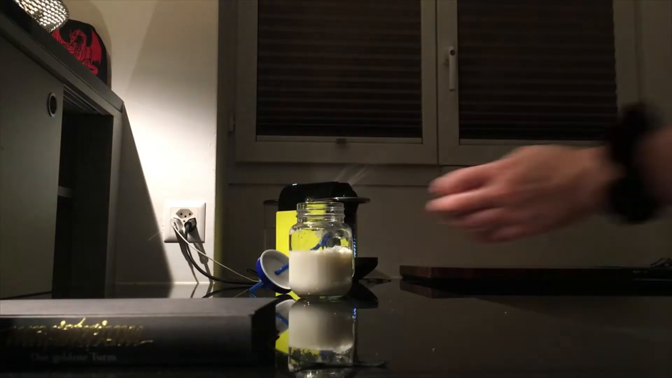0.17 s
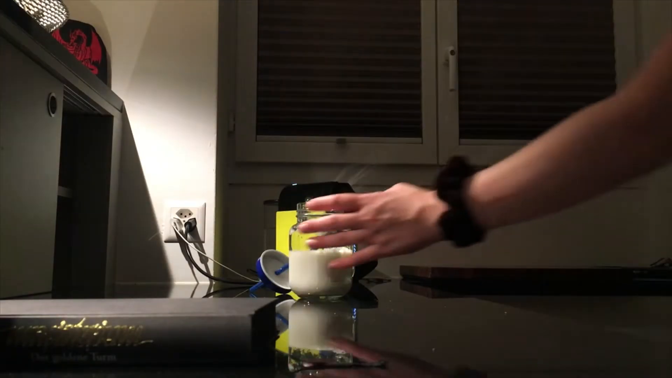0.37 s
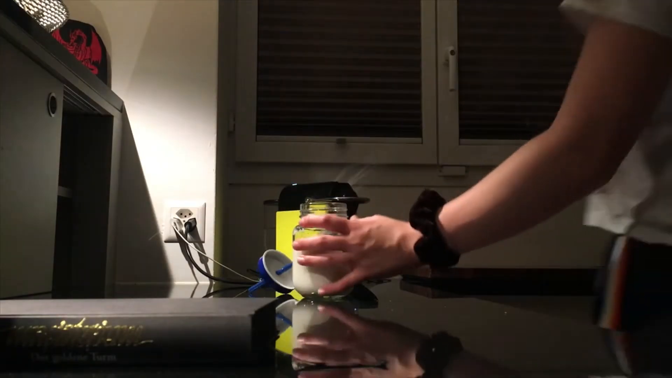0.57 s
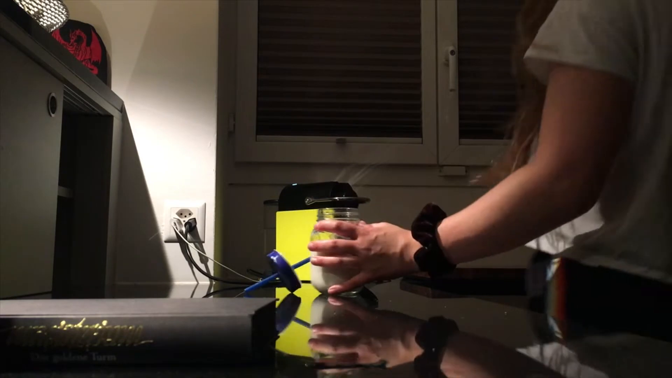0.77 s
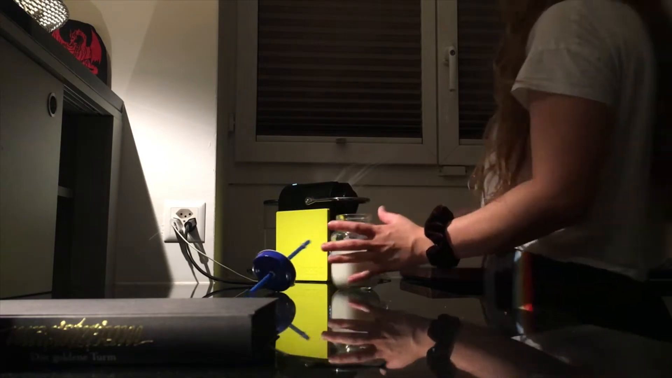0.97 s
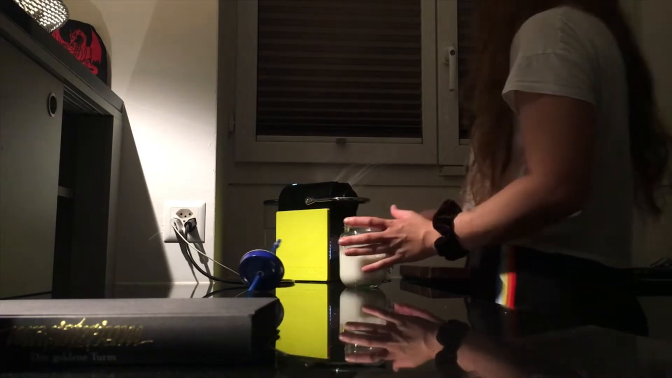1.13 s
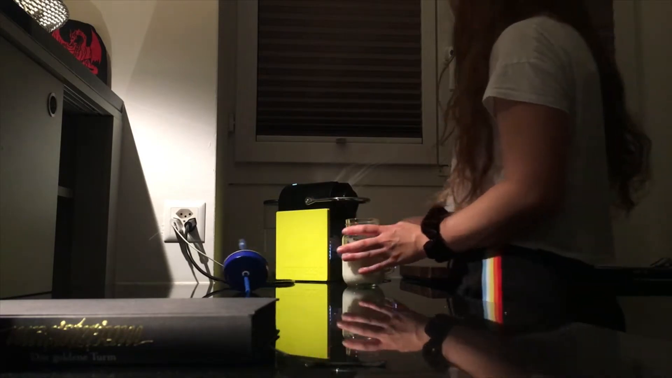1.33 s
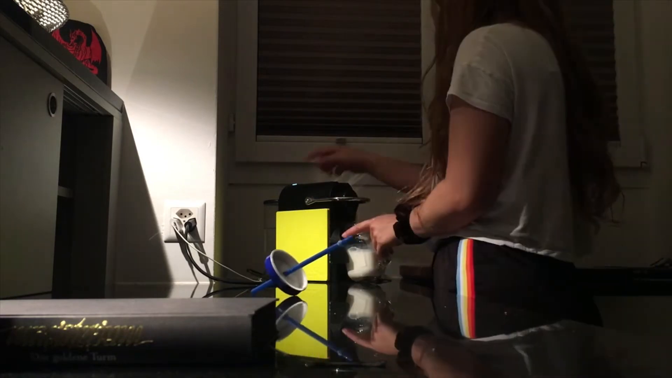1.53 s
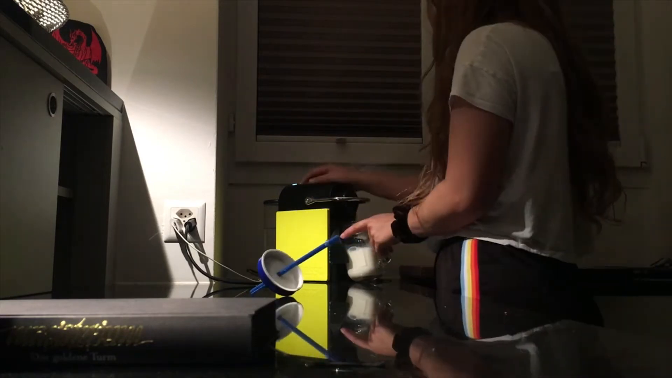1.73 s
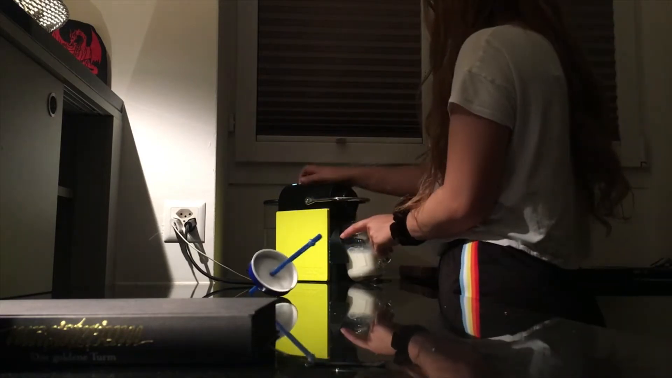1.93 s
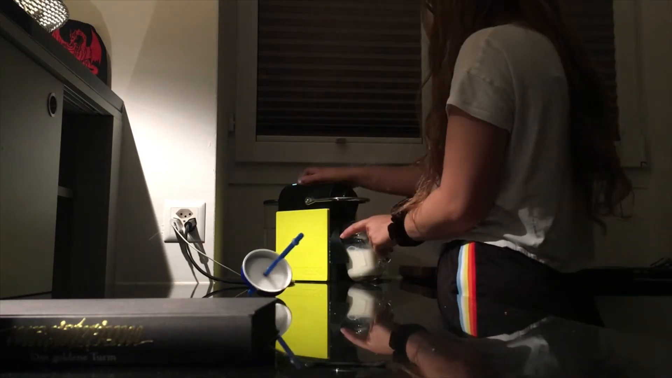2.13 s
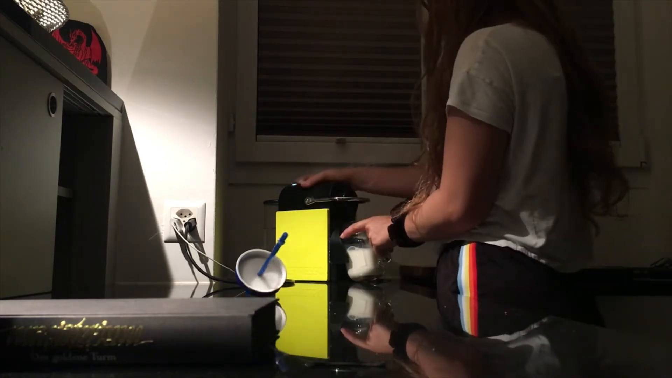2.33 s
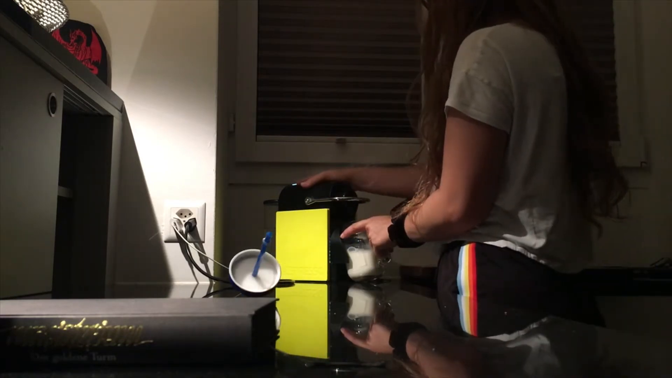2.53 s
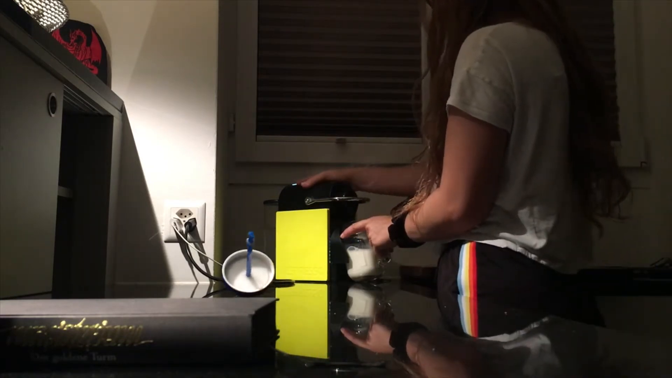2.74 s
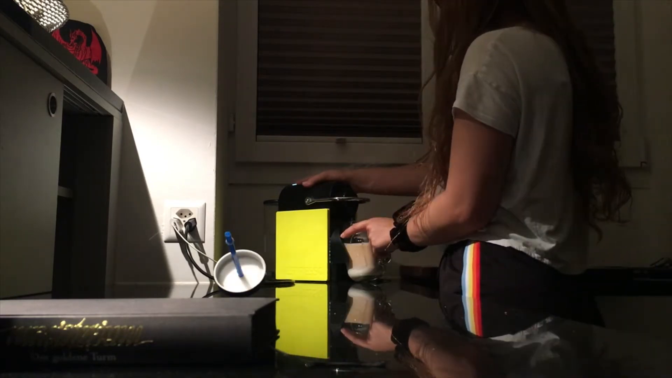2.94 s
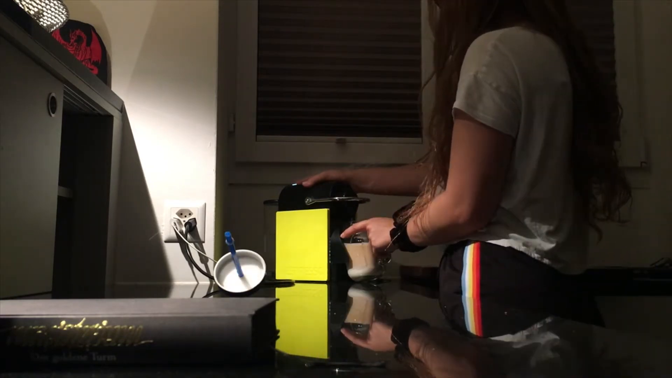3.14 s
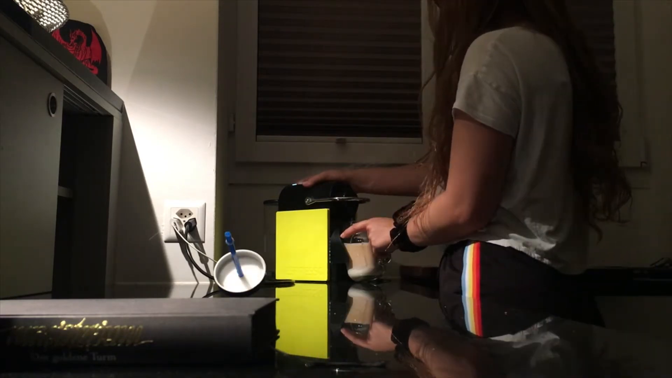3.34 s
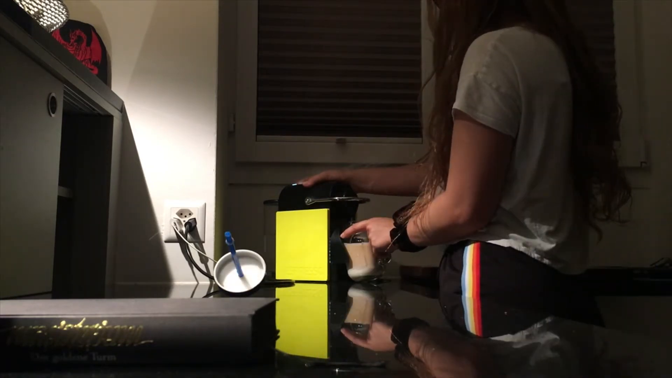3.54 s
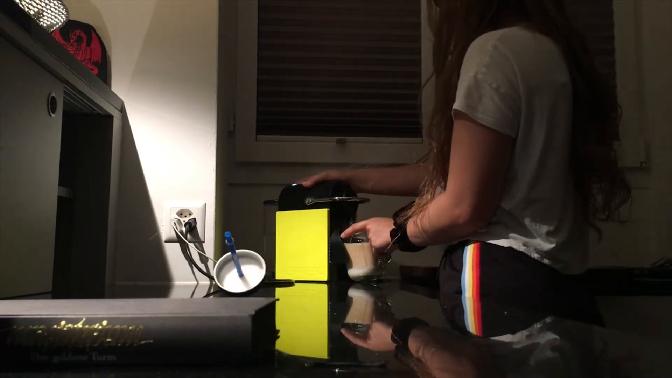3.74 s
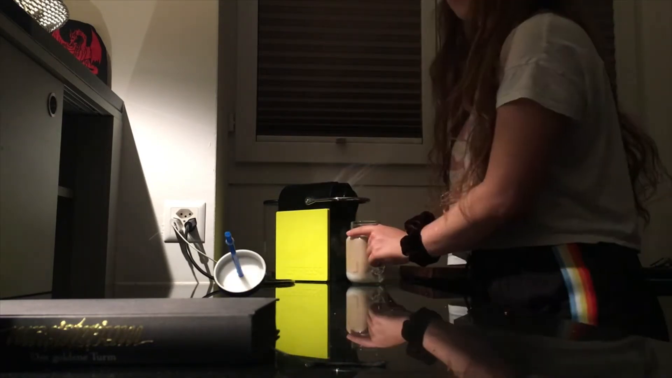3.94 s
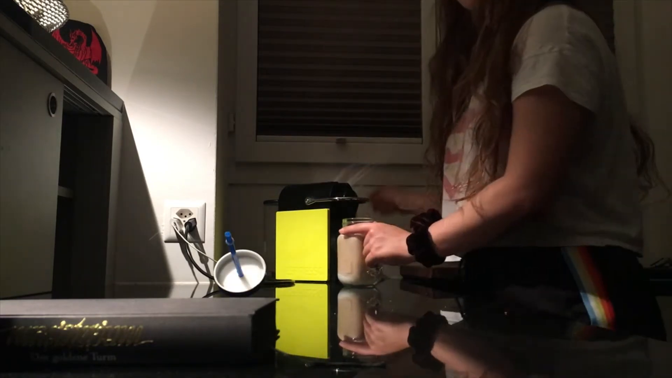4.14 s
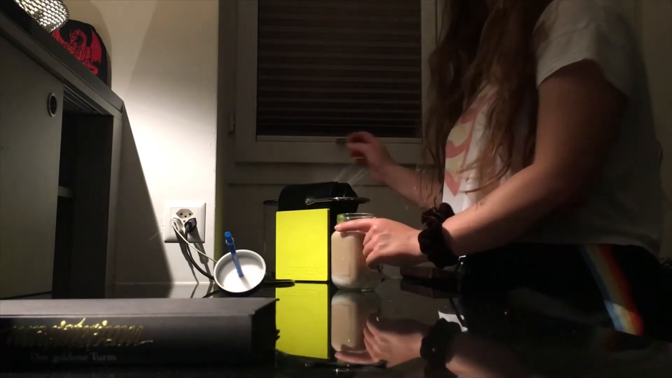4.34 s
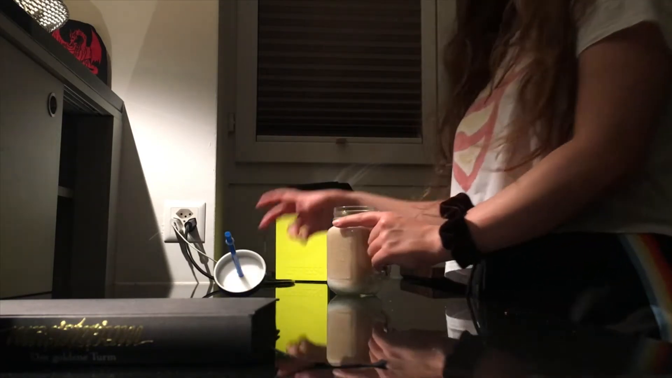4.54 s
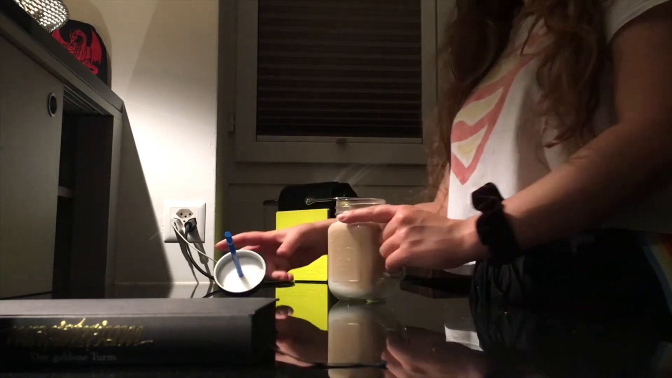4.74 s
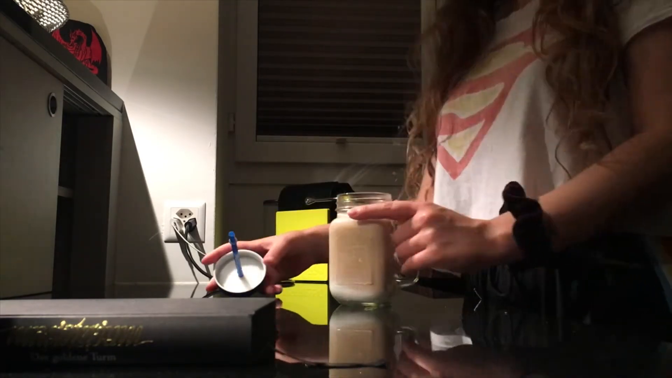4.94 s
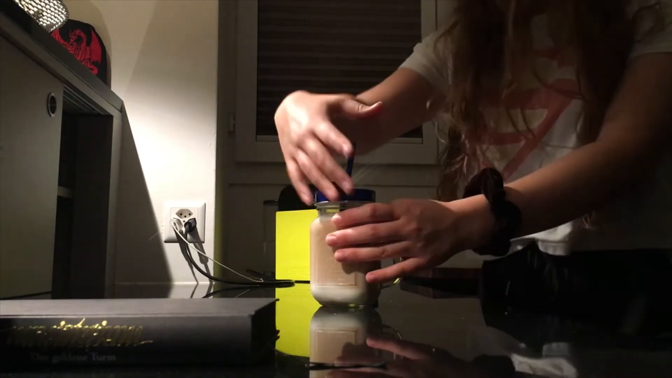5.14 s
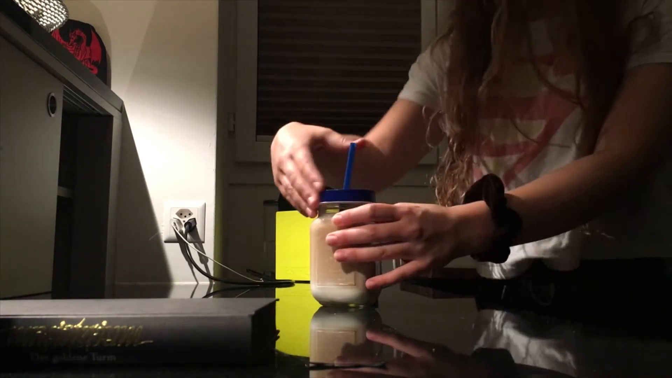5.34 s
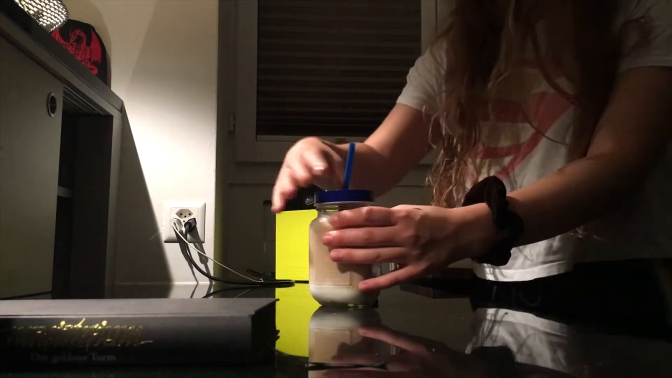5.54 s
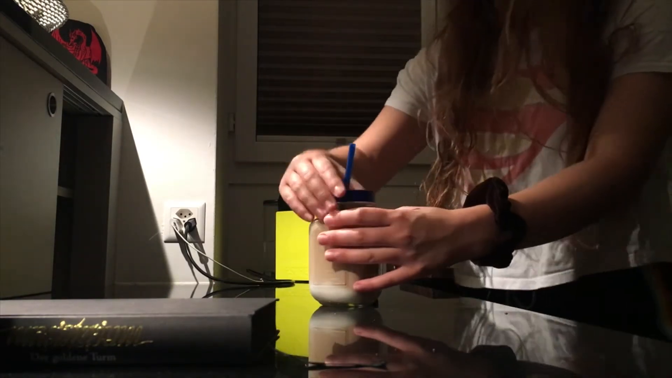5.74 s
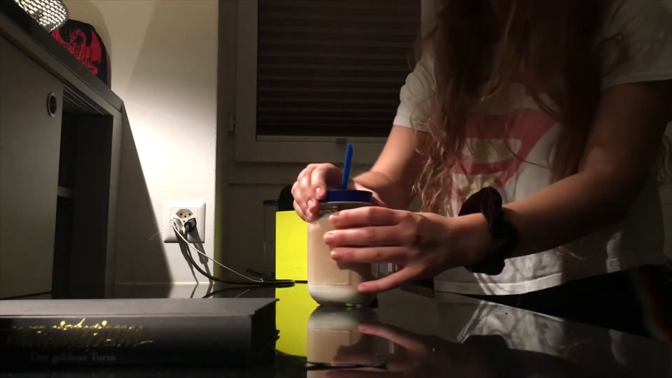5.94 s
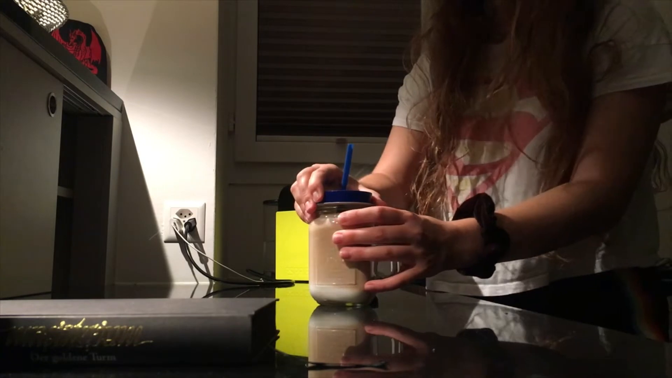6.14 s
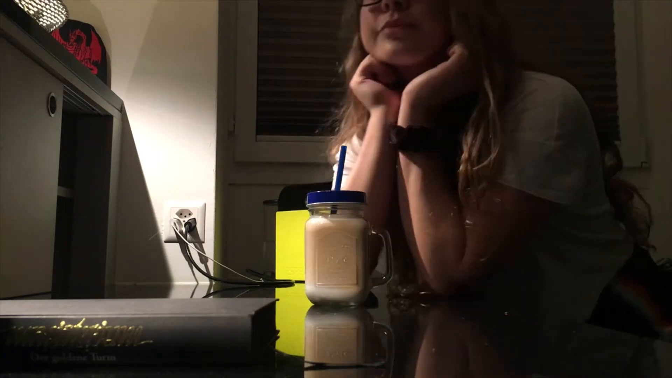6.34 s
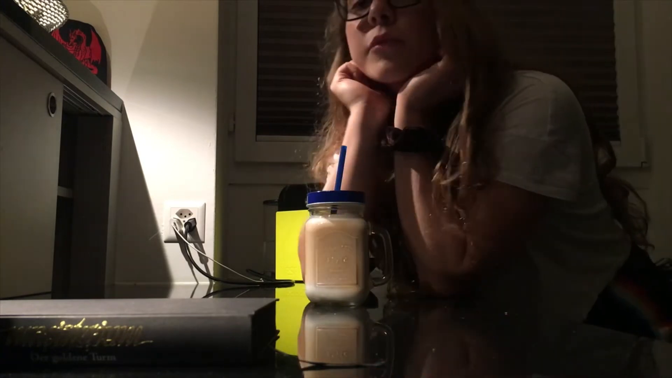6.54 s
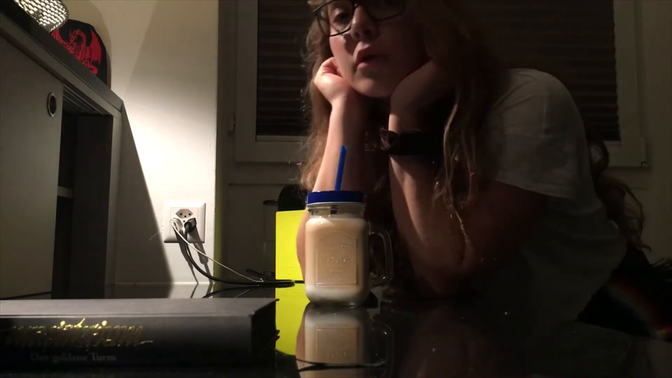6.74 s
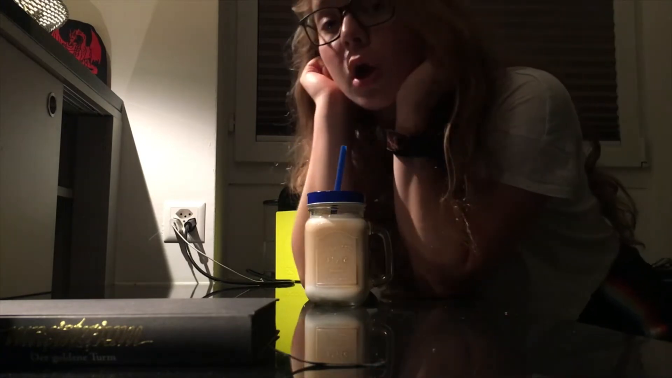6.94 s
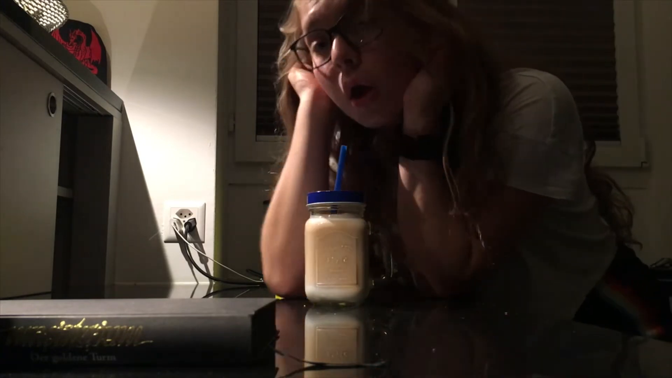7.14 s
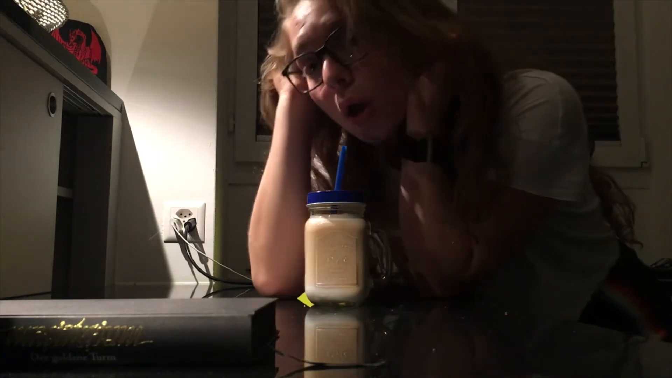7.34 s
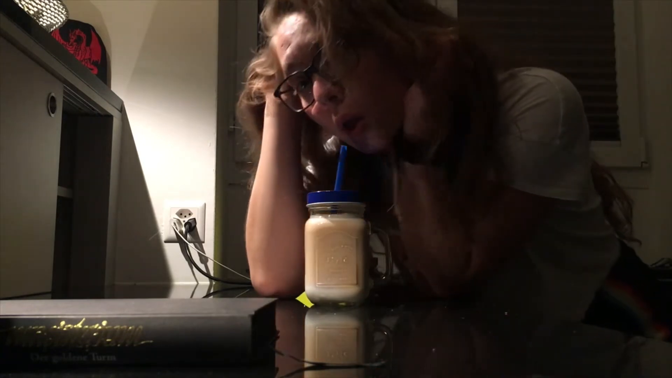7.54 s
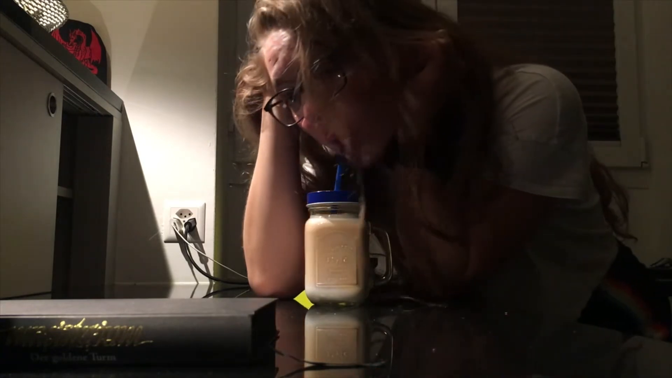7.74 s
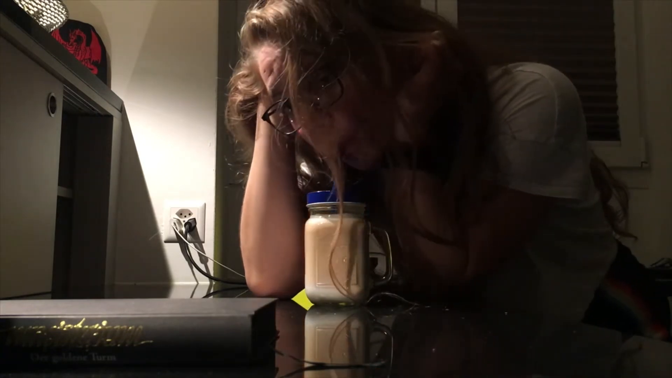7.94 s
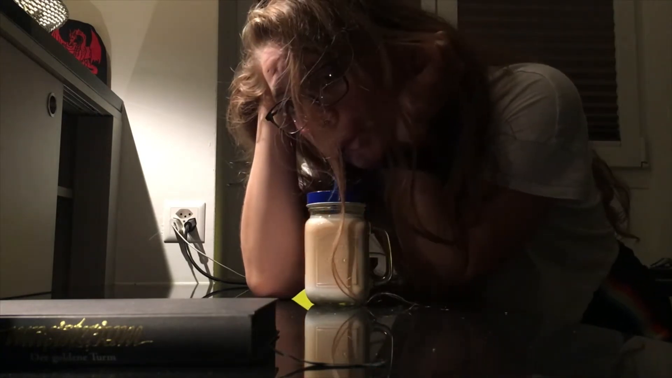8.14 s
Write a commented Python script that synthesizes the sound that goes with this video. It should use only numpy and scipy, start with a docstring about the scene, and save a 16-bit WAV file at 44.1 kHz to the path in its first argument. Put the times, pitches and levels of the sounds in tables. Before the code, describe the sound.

Glass dragged with a judder, a harsh low vibrating pump buzz that changes under load, a loud hollow plastic clack, then quiet lid and straw handling.

```python
"""A low room rumble, a faint swish of clothes and a soft bump, then a glass jar dragged over a kitchen counter.
Friction noise and struck-glass modes form the jar; cracks and casing modes form the coffee machine's button.
Its vibrating pump buzzes near 50 Hz, first free, then under load: a stroke-locked hum, churn and rattle.
The lever snaps open, the jar is dragged back, and a straw scratches, a lid taps and its thread rubs on the
glass. Most contact sounds excite the sparse, decaying reflections of a small hard room."""
import sys
import numpy as np
from scipy import signal
from scipy.fft import rfft, irfft
from scipy.io import wavfile
from scipy.ndimage import uniform_filter1d, map_coordinates

SR = 44100
rng = np.random.default_rng(int(sys.argv[2]) if len(sys.argv) > 2 else 0)


def wav_record(signal):
    """Record a signal, one row per channel, as 16-bit PCM in the file named by sys.argv[1]."""
    frames = np.transpose(np.atleast_2d(signal))
    bounded = np.clip(frames, -1, 1)
    # unit amplitude maps onto the largest positive 16-bit level
    quanta = np.round(bounded * 32767).astype(np.int16)
    wavfile.write(sys.argv[1], SR, quanta)


N = 361619
TIME = np.arange(N) / SR

# Colours are spectra scaled to unit power gain, so their dB values are relative.
# Levels of short blows are their energy spread over a hundredth of a second.

# Reverberation of the kitchen. Each row: frequency in Hz, t60 in s.
ROOM = [(700, 0.67), (3500, 0.64), (12000, 0.48)]
EDGE_HZ = 15900  # upper limit of the band

# Colour of the room rumble. Each row: frequency in Hz, density in dB per Hz.
FLOOR = [(30, -13), (72, -17), (105, -6), (200, -8.5), (390, -8), (510, -16.5), (900, -14.5), (1500, -29.5),
         (4800, -37), (15500, -42.5)]
FLOOR_DB = -64

# Clothes swish with each move of the arm. Each row: start in s, length before the release in s, level in dB.
SWISHES = [(0.062, 0.15, -61.5), (0.643, 0.073, -57), (0.793, 0.21, -65.5), (1.144, 0.14, -60.5),
           (4.59, 0.098, -65), (5.811, 0.24, -76)]
SWISH_ATTACK_S, SWISH_RELEASE_DB_PER_S = 0.036, 85
# Colour of rubbing cloth. Each row: frequency in Hz, density in dB per Hz.
CLOTH_COLOUR = [(1200, -8), (3500, 1), (7000, -3), (15000, -9.5)]

# Soft bumps on the counter and floor. Each row: time in s, level in dB.
BUMPS = [(0.283, -42), (4.03, -53), (4.345, -52), (4.628, -47.5), (6.28, -49.5)]
# Colour of the bumps. Each row: frequency in Hz, density in dB per Hz.
BUMP_COLOUR = [(38, -0.5), (70, -0.5), (110, -9)]

# The jar dragged away and back. Each row: start in s, stop in s, fastest moment in s, level then in dB,
# dB lost by the stop, glass note in Hz, level of the note relative to the friction in dB.
DRAGS = [(0.736, 1.43, 0.86, -40, 13, 1782, -25), (4.2, 5.033, 4.566, -44, 5, 4500, -39)]
# Colour of the drag away. Each row: frequency in Hz, density in dB per Hz.
PUSH_COLOUR = [(230, -41.5), (450, -20), (610, -2), (700, -1.5), (830, 9), (980, -3), (1750, -16.5),
               (5000, -47)]
# Colour of the drag back. Each row: frequency in Hz, density in dB per Hz.
PULL_COLOUR = [(200, -18.5), (540, -4), (700, 4), (820, -9), (980, 2.5), (1220, -5.5), (1530, -2),
               (1900, -13), (2700, -26.5), (5200, -31.5)]
# The jar's base catches on the counter. Each row: time in s, level in dB.
CATCHES = [(0.568, -56), (0.590, -46), (0.607, -44.5), (0.740, -36), (0.782, -41), (0.814, -37.5),
           (0.878, -39.5), (1.145, -42.5), (4.617, -44), (4.659, -42.5), (4.910, -45.5)]
# The glass base sings faintly as it slides. Each row: time in s, central pitch in Hz, level in dB.
SQUEAL = [(0.70, 5280, -75), (0.89, 5030, -68), (0.955, 4770, -68), (1.03, 4680, -77), (1.14, 4860, -73)]

# The glass clinks. Each row: time in s, ring level in dB, click level in dB.
CLINKS = [(0.706, -52.5, -49), (0.843, -50, -46)]
# Modes of the glass. Each row: frequency in Hz, relative level in dB, t60 in s.
GLASS = [(2530, -1, 0.03), (3405, 3, 0.065)]
# Colour of the click of lid or glass. Each row: frequency in Hz, density in dB per Hz.
LID_CLICK = [(700, 21.5), (1900, 4), (3500, -7), (15000, -28)]

# Button and lever of the machine, the last in three quick contacts. Each row: time in s,
# hollow ring level in dB, clatter level in dB, crack level in dB, crack decay constant in s.
KNOCKS = [(1.696, -57, -47.5, -49.5, 0.008), (1.757, -44.5, -39, -53, 0.006),
          (1.819, -72, -50.5, -56, 0.007), (3.883, -35, -42, -55.5, 0.006), (3.902, -32, -28.5, -39, 0.004),
          (4.022, -35, -29.5, -30, 0.005), (4.0251, -25, -22.5, -23, 0.005),
          (4.029, -15, -28.5, -27.5, 0.004)]
# Hollow casing: a short thud over a lasting ring. Each row: frequency in Hz, level in dB before the
# casing's band filter, t60 in s.
CASING = [(565, -12, 0.16), (642, -13.5, 0.15), (688, -10, 0.19), (715, 0, 0.03)]
# Band that the casing radiates: lower and upper edge in Hz.
CASING_BAND_HZ = (480, 960)
# Colour of the clattering parts. Each row: frequency in Hz, density in dB per Hz.
CLATTER = [(130, -7), (480, -7.5), (720, 3), (960, -1.5), (1500, -4), (1900, -12.5), (3900, -24),
           (7000, -30)]
# Colour of the hard plastic crack. Each row: frequency in Hz, density in dB per Hz.
CRACK = [(110, -16), (400, -6), (1400, 2.5), (2600, -5), (4000, -1.5), (5000, -7), (6200, -7.5),
         (15500, -24.5)]
LATCH_S, LATCH_DB = 3.9025, -27  # the lever's latch lets go
# Modes of the latch. Each row: frequency in Hz, relative level in dB, t60 in s.
LATCH = [(940, 0, 0.09), (1105, -3, 0.07), (1470, -2, 0.025), (3780, -5, 0.016)]

PUMP_ON_S, FALTER_S, LOAD_S, PUMP_OFF_S = 1.938, 2.887, 2.898, 3.854
STROKE_HZ, SNAP_RISE_S = 49.94, 0.0022
FREE_DRIFT, LOADED_DRIFT, UNEVEN = 0.5, 0.17, 0.11  # relative rms: hum drift free and loaded, stroke force
# Hum of the free pump. Each row: multiple of the stroke rate, relative level in dB.
FREE_HUM = [(3, 0.5), (4, 2.5), (5, 2.5), (6, -1), (7, 0), (8, -2), (9, 5.5), (10, 9.5), (15, 7.5),
            (16, 5.5), (20, 6.5), (25, 8), (30, 8), (49, 3.5)]
# Hum of the loaded pump. Each row: multiple of the stroke rate, relative level in dB.
LOADED_HUM = [(3, -12.5), (4, -12.5), (6, -12), (7, -23.5), (8, -14), (9, -15), (10, -10.5), (11, -15),
              (12, -14.5), (13, -16), (14, -20), (16, -10.5), (17, -11.5), (18, -7), (19, -11), (20, 0),
              (21, -13.5)]
# Rattle of the free pump. Each row: frequency in Hz, density in dB per Hz.
FREE_RATTLE = [(970, -5), (1650, -2), (2450, 1.5), (3240, -7), (4250, -4.5), (4850, -11.5), (5500, -6),
               (15500, -24)]
# Rattle of the loaded pump. Each row: frequency in Hz, density in dB per Hz.
LOADED_RATTLE = [(1750, -7.5), (2200, -4.5), (2500, 0.5), (3150, -15), (3450, -8), (4200, -7),
                 (4900, -20.5), (5800, -8), (6600, -11.5), (7400, -16.5), (10500, -24), (12200, -23),
                 (15500, -30.5)]
# Colour of water in the pump chamber. Each row: frequency in Hz, density in dB per Hz.
CHURN = [(300, -2.5), (700, -2), (890, 1.5), (1150, -1.5), (1650, -3)]
# Small metal parts zing with every stroke. Each row: frequency in Hz, relative level in dB, t60 in s.
ZING = [(6550, 5, 0.022), (11150, 0, 0.014)]
ZING_DB = -19  # against the rattle
# free: the hum grows from its first level as the chamber fills; the rattle runs up to its final level
FREE_HUM_DB, HUM_GROWTH_DB_PER_S, FREE_CHURN_DB = -46.5, 5, -44.5
FREE_RATTLE_DB, RUN_UP_DB, RUN_UP_S = -44.5, 8.5, 0.1
# under load: the hum sags from its first level; the rattle settles after a harder first stroke
LOADED_HUM_DB, HUM_SAG_DB_PER_S, LOADED_CHURN_DB = -42.5, 1, -49
LOADED_RATTLE_DB, LOAD_JOLT_DB, LOAD_JOLT_S = -47, 2.5, 0.024
# Air and water gurgle in the filling chamber. Each row: time in s, resonance in Hz, level in dB.
GURGLE = [(1.94, 1020, -41), (2.03, 1160, -39.5), (2.2, 1180, -43.5), (2.4, 1430, -55), (2.47, 1230, -38.5),
          (2.6, 1290, -46.5), (2.88, 1230, -63)]
GURGLE_WIDTH_HZ = 420

# The straw scratches the lid as it is picked up and seated. Each row: time in s, level in dB.
STRAW = [(4.769, -58), (4.812, -54.5), (4.826, -60), (5.46, -64.5)]
# Colour of the scratch. Each row: frequency in Hz, density in dB per Hz.
STRAW_COLOUR = [(5800, -6), (14500, -4)]
STRAW_PING_S, STRAW_PING_DB = 7.987, -66.5  # the straw pings against the lid
# Modes of the straw. Each row: frequency in Hz, relative level in dB, t60 in s.
STRAW_MODES = [(3890, 3, 0.019), (5830, 2, 0.018), (6400, -7, 0.025)]

# The lid and straw tap the jar. Each row: time in s, ring level in dB before a 2 dB cut, click level in dB.
TAPS = [(5.253, -61.5, -59.5), (5.293, -53.5, -57.5), (5.379, -50, -68), (5.469, -49, -51.5),
        (5.679, -48.5, -58), (5.76, -57, -59), (5.93, -57.5, -57), (5.983, -62, -56), (7.841, -54.5, -80),
        (8.059, -51, -54)]
# Modes of the lid. Each row: frequency in Hz, mean relative level in dB, t60 in s before the hand damps it.
LID = [(427.7, 3.5, 0.049), (487, 3.5, 0.21), (1003, -8, 0.1), (1820, -13, 0.12)]

# the lid's thread rubs on the glass, fading as the turn slows; it snaps as it first grips
THREAD_START_S, THREAD_STOP_S, THREAD_DB, THREAD_FADE_DB_PER_S = 5.582, 6.1, -63, 33
THREAD_BITE_DB = -66
# Colour of the thread. Each row: frequency in Hz, density in dB per Hz.
THREAD_COLOUR = [(1500, -1), (1950, 3.5), (2500, -16.5), (3200, -9), (4500, -17)]

# Small sharp ticks. Each row: time in s, level in dB.
TICKS = [(6.012, -62), (6.671, -50)]
# Colour of the ticks. Each row: frequency in Hz, density in dB per Hz.
TICK_COLOUR = [(1050, -0.5), (1630, -8), (3450, -17.5), (4300, -5), (6680, -3.5), (7900, -13.5),
               (11400, -12), (14000, -37)]


def gain_of(db):
    """Logarithmic level: decibels to amplitude."""
    return 10 ** (np.asarray(db) / 20)


def evened(x):
    """Mean-square normalization: scales to rms 1."""
    return x / np.sqrt(np.mean(x ** 2) + 1e-20)


def read(points, hz):
    """Linear interpolation of a table on a log-frequency axis."""
    f, value = np.transpose(points)
    return np.interp(np.log(hz + 1), np.log(f + 1), value)


def between(start, stop):
    """Gating: one from start to stop, with 4 ms edges inside."""
    return np.clip(np.minimum(TIME - start, stop - TIME) / .004, 0, 1)


def swell(start, stop, attack_s, release_db_per_s):
    """Exponential decay: a linear attack, a hold until stop, then a steady fall in dB."""
    attack = np.clip((TIME - start) / attack_s, 0, 1)
    return attack * gain_of(-abs(release_db_per_s) * np.maximum(TIME - stop, 0))


def wobble(size):
    """Smoothed random fluctuation: a curve of rms 1 that changes within about size samples."""
    smooth = uniform_filter1d(rng.standard_normal(N), size)
    return evened(uniform_filter1d(smooth, size))


def colour(x, points):
    """Minimum-phase filtering: unit power gain, falling steeply outside the table."""
    hz = np.fft.rfftfreq(4096, 1 / SR) + 1
    octaves_below = np.maximum(np.log2(points[0][0] / hz), 0)
    octaves_above = np.maximum(np.log2(hz / points[-1][0]), 0)
    db = read(points, hz) - 18 * (octaves_below + octaves_above)
    log_gain = np.log(gain_of(np.maximum(db, -100)))
    mirrored = np.r_[log_gain, log_gain[-2:0:-1]]
    # the Hilbert transform of the log gain gives the phase of a causal response
    taps = np.fft.ifft(np.exp(np.conj(signal.hilbert(mirrored)))).real
    return signal.oaconvolve(x, taps / np.linalg.norm(taps))[:len(x)]


def burst(decay_s, size=4096):
    """Impulsive excitation: a dying crackle with a flat spectrum and unit energy."""
    fade = np.exp(-np.arange(size) / SR / decay_s)
    x = rng.standard_normal(size)
    for _ in range(4):  # alternately impose the decay and flatten the spectrum
        x = irfft(np.exp(1j * np.angle(rfft(x * fade))), size)
        fade = np.sqrt(fade)
    return x


def scatter(decay_s, rise_s=0.00068, size=4096):
    """Multiple contact: parts chatter as noise that swells quickly and dies away."""
    t = np.arange(size) / SR
    return rng.standard_normal(size) * np.exp(-t / decay_s) * (1 - np.exp(-t / rise_s))


def ring(modes, damping=1):
    """Modal superposition: dying sines of a struck body; damping multiplies the decay rates."""
    t = np.arange(SR // 4) / SR
    return sum(gain_of(db - 60 * t * damping / t60) * np.sin(2 * np.pi * hz * t) for hz, db, t60 in modes)


def resonate(x, hz, width_hz):
    """Second-order resonance: a damped pole pair in a rotating frame follows a moving pitch."""
    turn = np.exp(2j * np.pi * np.cumsum(hz * np.ones(N)) / SR)
    r = np.exp(-np.pi * width_hz / SR)
    return (turn * signal.lfilter([1], [1, -2 * r, r * r], x / turn)).real


def blows(times, dbs, make):
    """Energy scaling: a fresh sound at each time, its energy set by the level over 10 ms."""
    out = np.zeros(N)
    for s, db in zip(times, dbs):
        sound = make()
        part = out[round(s * SR):]
        sound = gain_of(db) * sound * np.sqrt(SR / 100 / np.sum(sound ** 2))
        part[:len(sound)] += sound[:len(part)]
    return out


def room(x, wet_db):
    """Reverberation: sparse reflections of random sign, each band dying at its own speed."""
    reflections = rng.choice([-1., 1.], SR) * (rng.random(SR) < 4000 / SR)
    reflections = reflections * (TIME[:SR] > .004)
    hz, t, z = signal.stft(reflections, SR, nperseg=256)
    tail = signal.istft(z * gain_of(-60 * t / read(ROOM, hz)[:, None]), SR, nperseg=256)[1]
    return x + gain_of(wet_db) * signal.oaconvolve(x, tail / np.linalg.norm(tail))[:N]


def rub(force, points, slips_per_s, grit, wander=0):
    """Stick-slip friction: tiny releases ring the body and room; resonances wander as the contact shifts."""
    slips = (rng.random(N) < slips_per_s / SR) * rng.random(N)
    scuffs = signal.oaconvolve(slips, np.hanning(SR // 200))[:N]
    body = colour((evened(scuffs) + grit) * rng.standard_normal(N), points)
    shifted = map_coordinates(body, [np.cumsum(1 + wander * wobble(size=4000))], mode="mirror")
    return force * evened(room(shifted, wet_db=-0.5))


def room_rumble():
    """Broadband noise: a steady random background, strongest at low frequencies."""
    return gain_of(FLOOR_DB) * evened(colour(rng.standard_normal(N), FLOOR))


def clothes():
    """Dense friction: many small slips per second make the swish of cloth."""
    moves = sum(gain_of(db) * swell(s, s + length, SWISH_ATTACK_S, SWISH_RELEASE_DB_PER_S)
                for s, length, db in SWISHES)
    return rub(moves, CLOTH_COLOUR, slips_per_s=2300, grit=0.32)


def bumps():
    """Soft impact: slowly dying noise confined to low frequencies."""
    return blows(*np.transpose(BUMPS), lambda: colour(scatter(0.035, size=8192), BUMP_COLOUR))


def drag(start, stop, fastest, db, slowing_db, ring_hz, ring_db, points, slips_per_s, grit):
    """Sliding friction: force follows the jar's speed in one arch, and keeps a glass note ringing faintly."""
    slowing = ((TIME - fastest) / (stop - fastest)) ** 2
    force = between(start, stop) * gain_of(db - abs(slowing_db) * slowing)
    glass = gain_of(ring_db) * evened(resonate(rng.standard_normal(N), ring_hz, width_hz=25))
    return rub(force, points, slips_per_s, grit, wander=0.05) + force * glass


def squeal():
    """Friction-driven oscillation: a thin gliding tone of unsteady pitch and fluttering level."""
    s, hz, db = np.transpose(SQUEAL)
    pitch = np.interp(TIME, s, hz) * (1 + 0.008 * wobble(size=100))
    tone = np.sin(2 * np.pi * np.cumsum(pitch) / SR) * (1 + wobble(size=300))
    return between(s[0], s[-1]) * gain_of(np.interp(TIME, s, db)) * tone


def jar_slides():
    """Stick-slip on a counter: the glass base judders, catches now and then, and sings."""
    away, back = DRAGS
    push = drag(*away, PUSH_COLOUR, slips_per_s=380, grit=0.8)
    pull = drag(*back, PULL_COLOUR, slips_per_s=260, grit=0.7)
    catches = blows(*np.transpose(CATCHES), lambda: colour(scatter(0.0049, rise_s=0.0027), PUSH_COLOUR))
    return push + pull + room(catches + squeal(), wet_db=-2.5)


def glass_clinks():
    """Modal impact: a very short click and two ringing modes of the glass."""
    s, ring_db, click_db = np.transpose(CLINKS)
    rings = blows(s, ring_db, lambda: ring(GLASS))
    clicks = blows(s, click_db, lambda: colour(burst(0.00084), LID_CLICK))
    return room(rings + clicks, wet_db=-5.5)


def machine_knocks():
    """Impact on a hollow shell: a plastic crack, clattering parts, a ringing latch and the casing's thud."""
    s, ring_db, clatter_db, _, _ = np.transpose(KNOCKS)
    radiated = signal.butter(2, CASING_BAND_HZ, "bandpass", fs=SR)  # the small casing radiates in this band
    body = blows(s, ring_db, lambda: signal.lfilter(*radiated, ring(CASING)))
    latch = blows([LATCH_S], [LATCH_DB], lambda: ring(LATCH))
    clatter = blows(s, clatter_db, lambda: colour(scatter(0.015), CLATTER))
    crack = sum(blows([at], [db], lambda: colour(burst(decay_s), CRACK)) for at, _, _, db, decay_s in KNOCKS)
    return room(body, wet_db=-3.0) + room(clatter + latch, wet_db=-4.0) + room(crack, wet_db=-4.5)


def strokes(levels_db, hum, rattle, first_s, snap_s, loose_db, waver, drift):
    """Periodic excitation: each piston stroke rings the casing alike, and shakes parts and water anew."""
    size = round(SR / STROKE_HZ)
    # position within the stroke, 0 to 1, with a slow timing jitter
    place = (TIME - first_s + waver * 0.00073 * wobble(size=8000)) * STROKE_HZ % 1

    def repeat(cycle):
        return evened(np.interp(place, np.arange(size) / size, cycle, period=1))

    orders, dbs = np.transpose(hum)
    heights = np.bincount(np.round(orders).astype(int), gain_of(dbs), size // 2 + 1)

    def hum_cycle():
        return repeat(irfft(heights * rfft(burst(0.04, size=size)), size))

    # the pressure drifts, so each partial wavers on its own
    tone = evened(hum_cycle() + drift * wobble(size=2000) * hum_cycle())
    # the piston hits its stop: a snap over the wash of earlier strokes
    fall = np.exp(-place / STROKE_HZ / snap_s)
    rise = np.exp((place - 1) / STROKE_HZ / SNAP_RISE_S)
    snap = evened(0.65 + fall + rise)
    # loose parts and water: one share repeats with every stroke, the other is new each time
    shake = repeat(burst(snap_s, size=size)) + gain_of(loose_db) * snap * rng.standard_normal(N)
    fresh_swirl = (0.85 + 0.25 * wobble(size=2500)) * rng.standard_normal(N)
    swirl = repeat(burst(0.037, size=size)) + fresh_swirl
    zing = gain_of(ZING_DB) * evened(signal.oaconvolve(shake, ring(ZING))[:N])
    parts = evened(colour(shake, rattle)) + zing
    parts = parts * (1 + UNEVEN * wobble(size=400))  # the force of the hits varies
    hum_gain, churn_gain, rattle_gain = map(gain_of, levels_db)
    force = 1 + waver * wobble(size=size)
    return force * (hum_gain * tone + churn_gain * evened(colour(swirl, CHURN)) + rattle_gain * parts)


def gurgle():
    """Cavity resonance: strokes churn air and water; the throaty level dips, then swells in one gulp."""
    s, hz, db = np.transpose(GURGLE)
    stroke = np.exp(-((TIME - PUMP_ON_S) * STROKE_HZ % 1) / STROKE_HZ / 0.026)
    throat = resonate(stroke * rng.standard_normal(N), np.interp(TIME, s, hz), GURGLE_WIDTH_HZ)
    return gain_of(np.interp(TIME, s, db)) * evened(throat)


def pump():
    """Forced vibration: the piston rattles freely until pressure builds, falters once, then lands later."""
    age = np.clip(TIME - PUMP_ON_S, 0, LOAD_S - PUMP_ON_S)
    filling = (FREE_HUM_DB + HUM_GROWTH_DB_PER_S * age,
               FREE_CHURN_DB,
               FREE_RATTLE_DB - RUN_UP_DB * np.exp(-age / RUN_UP_S))
    pressing = (LOADED_HUM_DB - HUM_SAG_DB_PER_S * (TIME - LOAD_S),
                LOADED_CHURN_DB,
                LOADED_RATTLE_DB + LOAD_JOLT_DB * np.exp(-abs(TIME - LOAD_S) / LOAD_JOLT_S))
    free = strokes(filling, FREE_HUM, FREE_RATTLE, first_s=1.9425, snap_s=0.013,
                   loose_db=3.5, waver=0.062, drift=FREE_DRIFT)
    loaded = strokes(pressing, LOADED_HUM, LOADED_RATTLE, first_s=2.9075, snap_s=0.0032,
                     loose_db=7.0, waver=0.06, drift=LOADED_DRIFT)
    free_run = swell(PUMP_ON_S, FALTER_S, attack_s=0.0051, release_db_per_s=606.5)
    loaded_run = swell(LOAD_S, PUMP_OFF_S, attack_s=0.0051, release_db_per_s=606.5)
    return free_run * (free + gurgle()) + loaded_run * loaded


def straw():
    """Scraping and modal impact: high scratching noise, and one ping of the straw's modes."""
    scratches = blows(*np.transpose(STRAW), lambda: colour(scatter(0.029), STRAW_COLOUR))
    ping = blows([STRAW_PING_S], [STRAW_PING_DB], lambda: ring(STRAW_MODES))
    return room(scratches + ping, wet_db=-5.5)


def lid_taps():
    """Damped modal impact: the hand shortens the lid's ring, and each tap excites its modes differently."""
    s, ring_db, click_db = np.transpose(TAPS)

    def gripped():
        struck = [(hz, db + 3 * rng.standard_normal(), t60) for hz, db, t60 in LID]
        return ring(struck, damping=1.6)

    rings = blows(s, ring_db - 2.0, gripped)
    clicks = blows(s, click_db, lambda: colour(scatter(0.0095), LID_CLICK))
    return room(rings + clicks, wet_db=-5.5)


def lid_thread():
    """Stick-slip friction: the thread snaps as it grips, then rubs on the glass and fades as the turn slows."""
    fade_db = THREAD_FADE_DB_PER_S * (TIME - THREAD_START_S)
    turn = between(THREAD_START_S, THREAD_STOP_S) * gain_of(THREAD_DB - fade_db)
    bite = blows([THREAD_START_S], [THREAD_BITE_DB], lambda: colour(burst(0.0023), THREAD_COLOUR))
    return rub(turn, THREAD_COLOUR, slips_per_s=230, grit=1.0) + room(bite, wet_db=-5.5)


def ticks():
    """Impulsive contact: short, bright bursts."""
    return room(blows(*np.transpose(TICKS), lambda: colour(burst(0.00262), TICK_COLOUR)), wet_db=-5.5)


def scene():
    """Linear superposition: the pressures of all sources add in one channel."""
    at_rest = room_rumble() + clothes() + bumps()
    jar_and_machine = jar_slides() + glass_clinks() + machine_knocks() + pump()
    lid_and_straw = straw() + lid_taps() + lid_thread() + ticks()
    return (at_rest + jar_and_machine + lid_and_straw)[None]


def record(dry):
    """Band limitation: a linear-phase lowpass removes the top of the spectrum."""
    return signal.oaconvolve(dry, signal.firwin(511, EDGE_HZ, window=("kaiser", 9), fs=SR)[None], "same")


dry = scene()
out = record(dry)
wav_record(out)
```